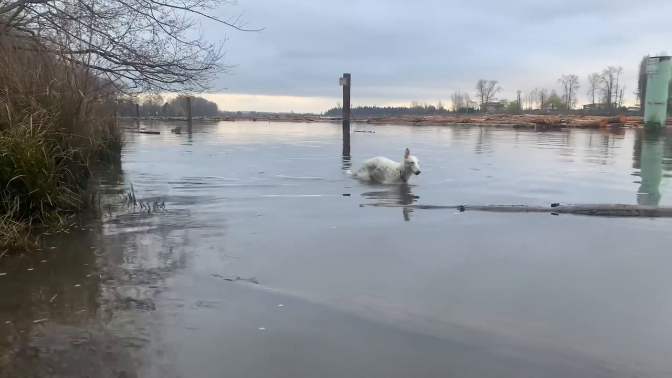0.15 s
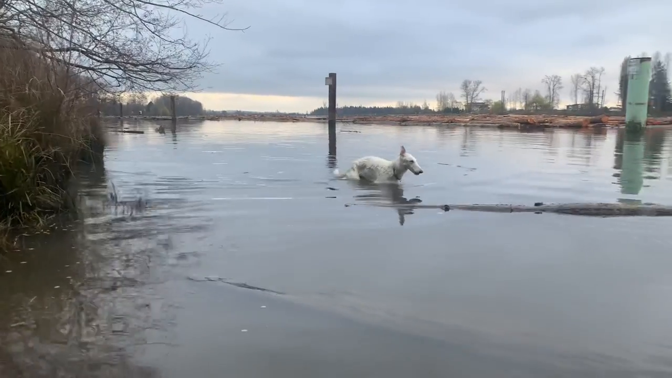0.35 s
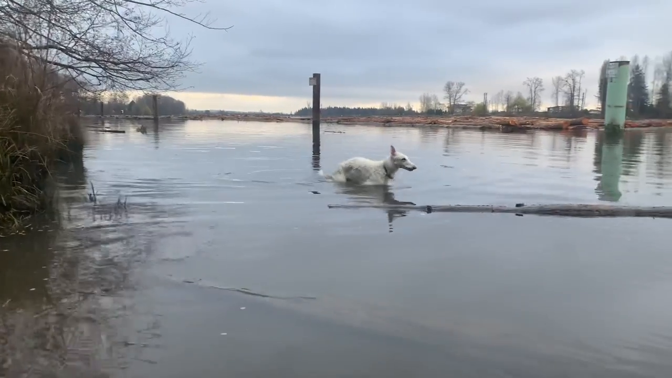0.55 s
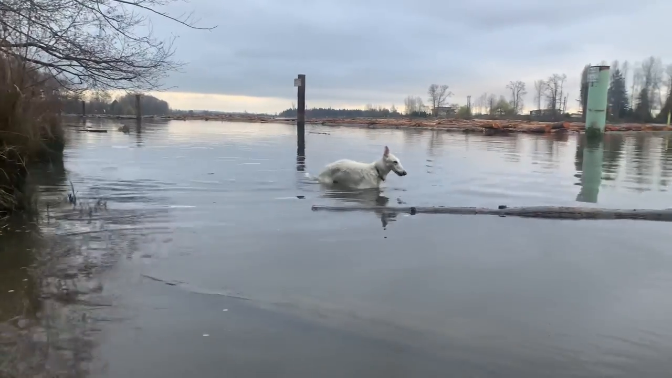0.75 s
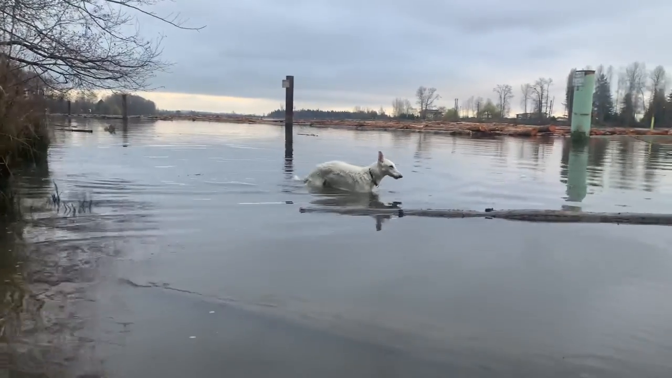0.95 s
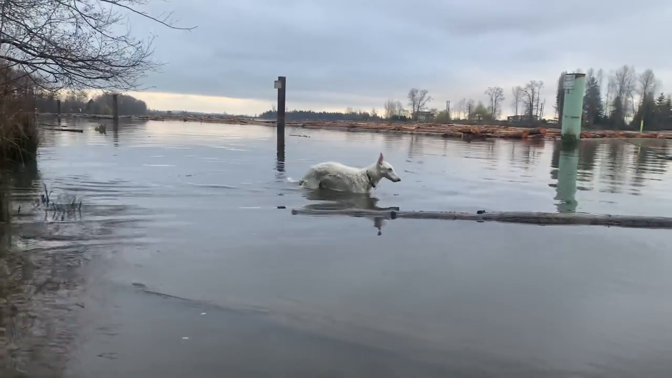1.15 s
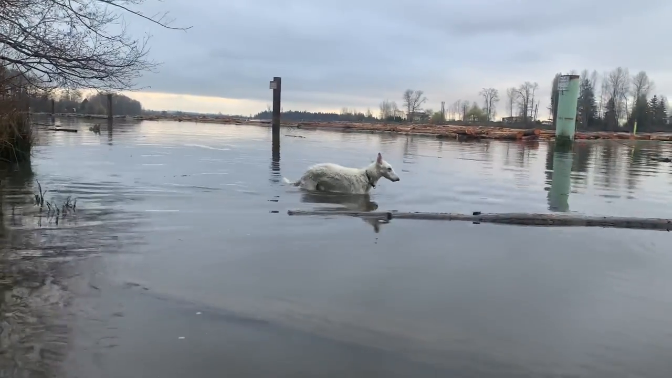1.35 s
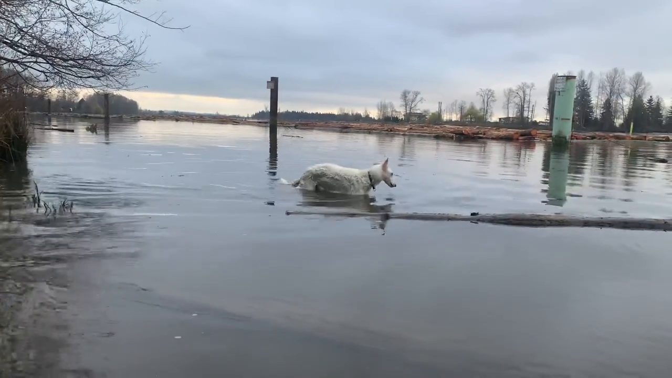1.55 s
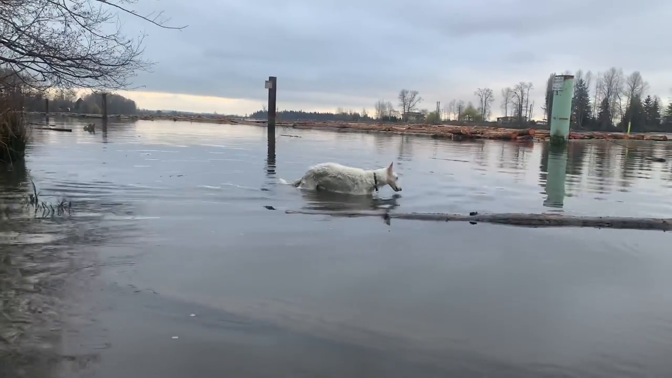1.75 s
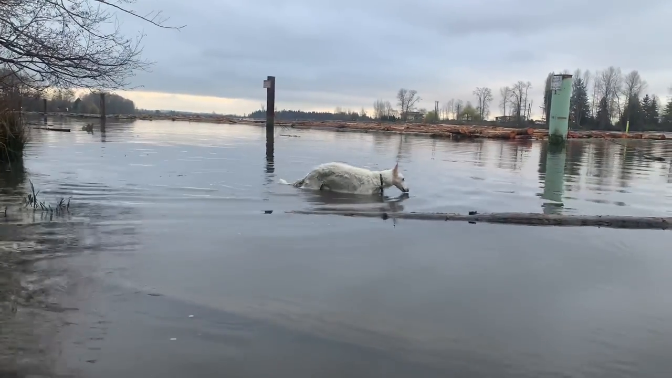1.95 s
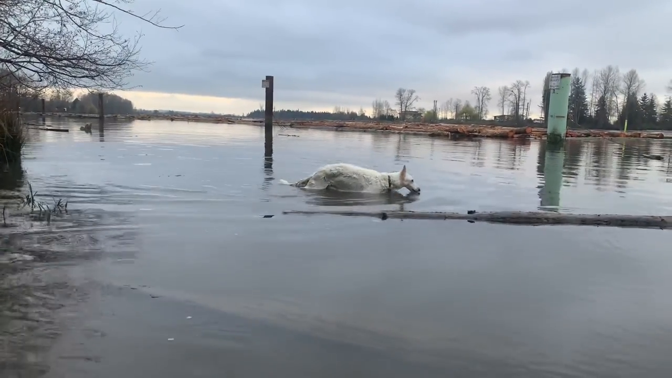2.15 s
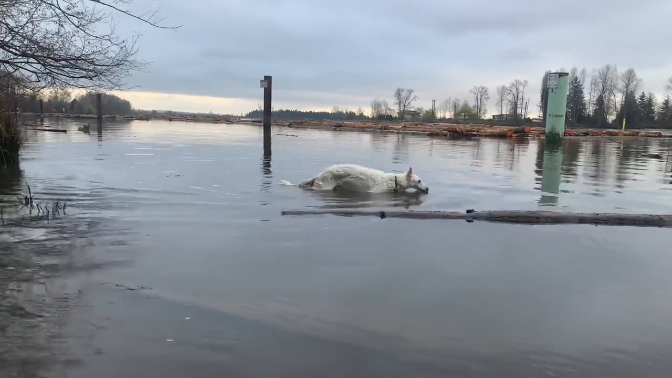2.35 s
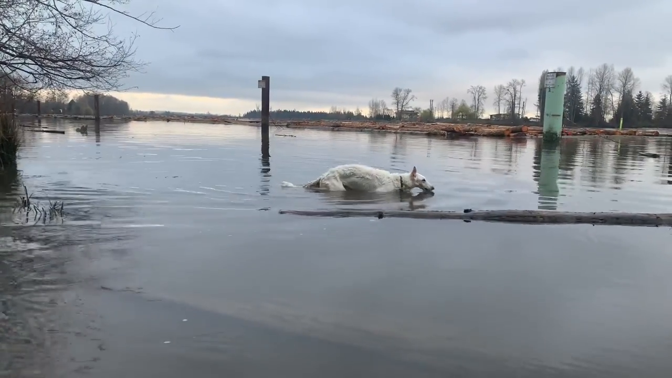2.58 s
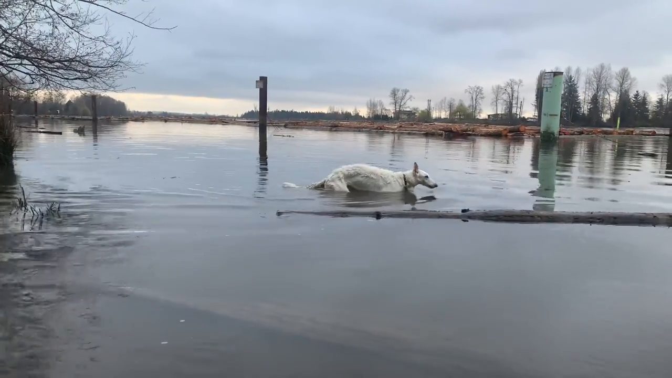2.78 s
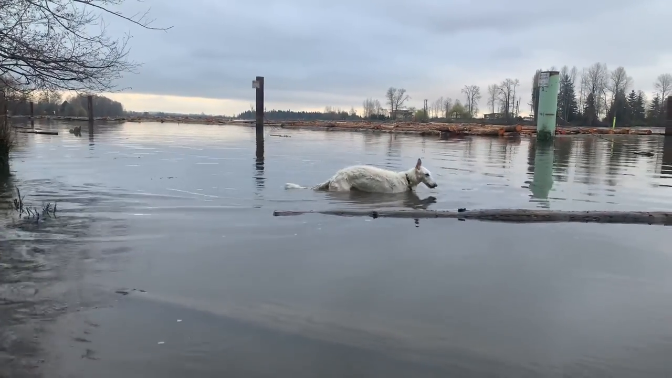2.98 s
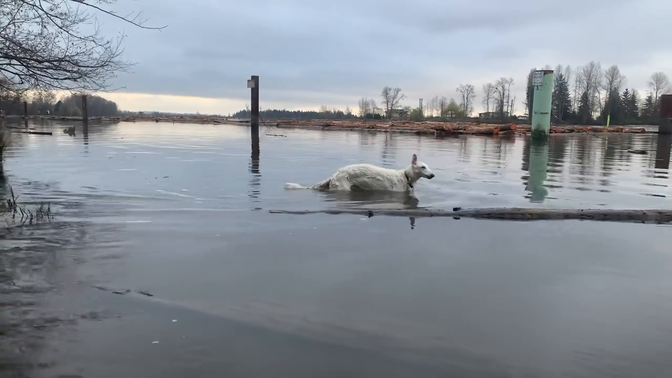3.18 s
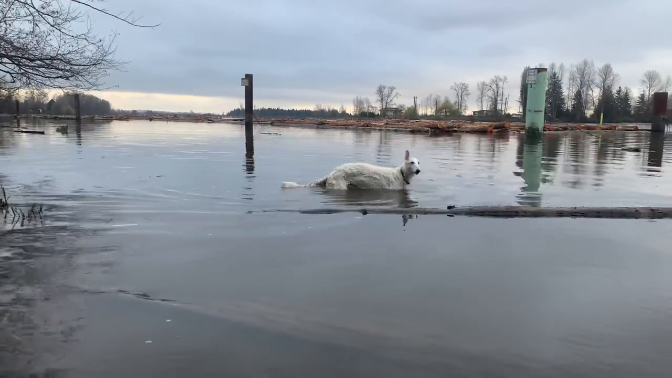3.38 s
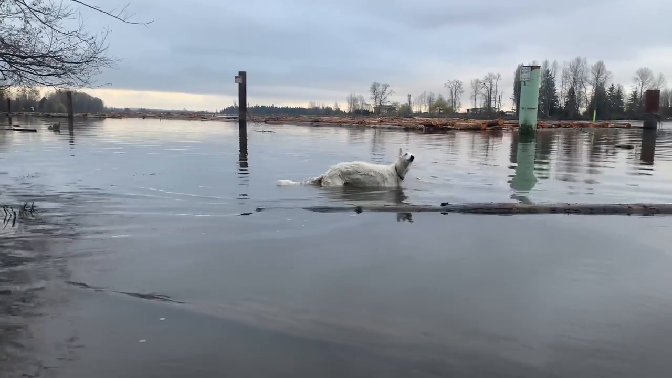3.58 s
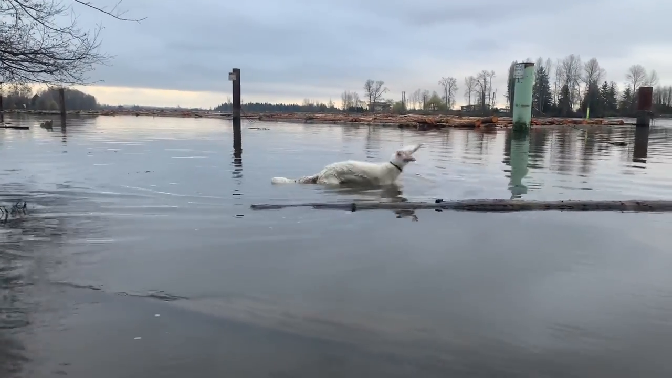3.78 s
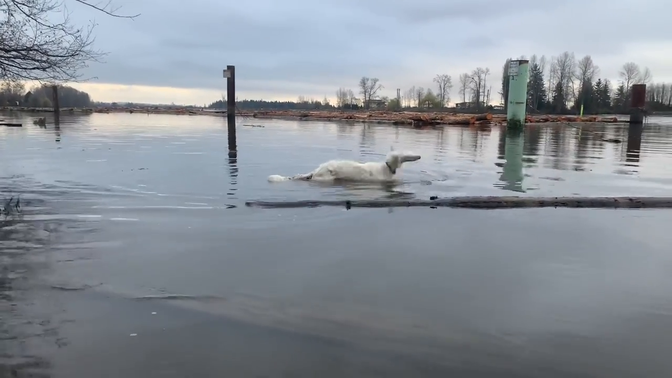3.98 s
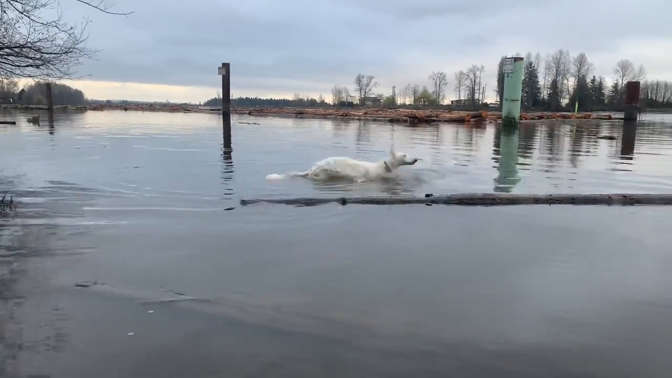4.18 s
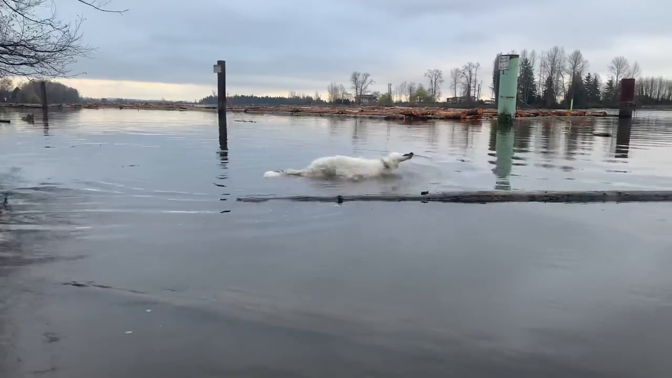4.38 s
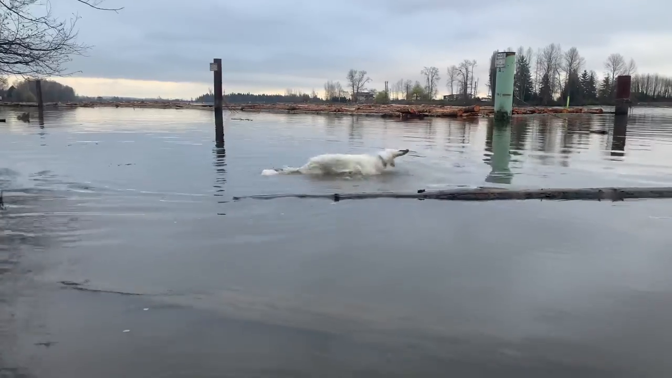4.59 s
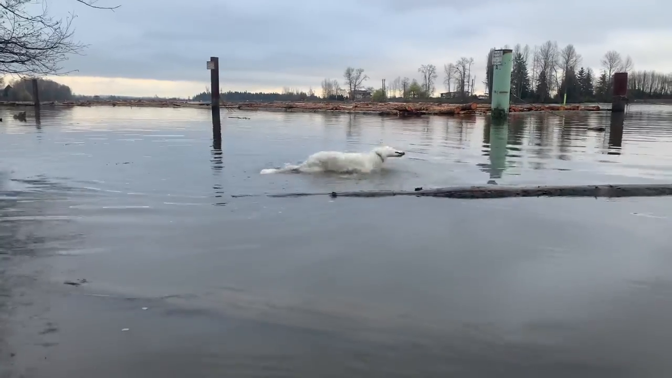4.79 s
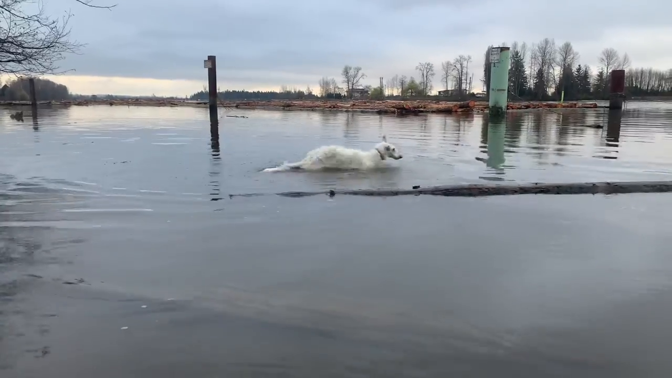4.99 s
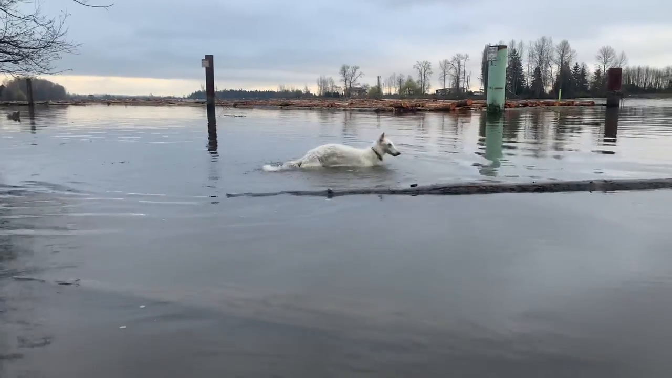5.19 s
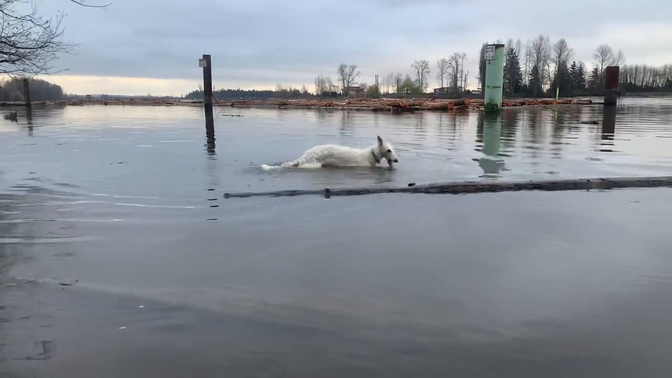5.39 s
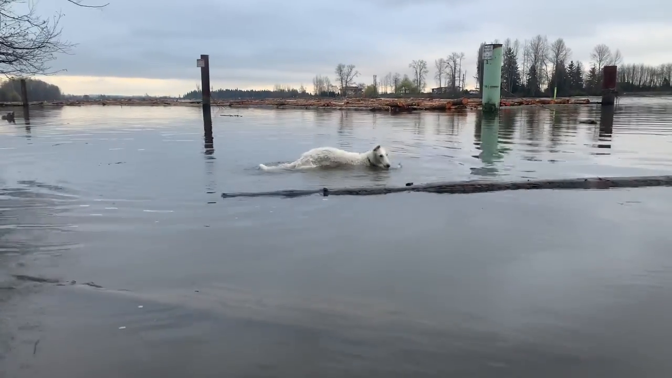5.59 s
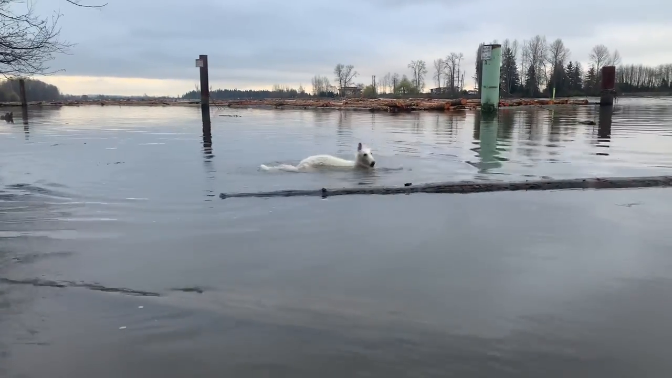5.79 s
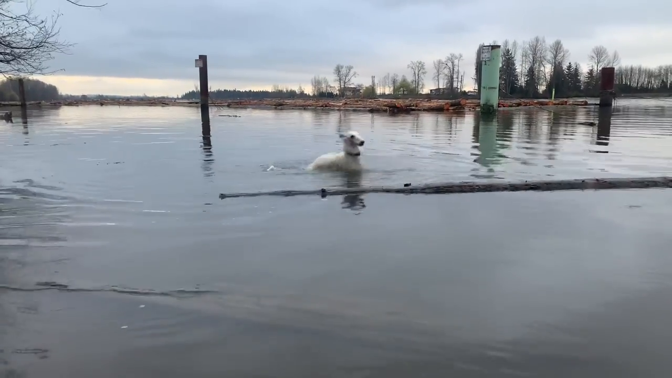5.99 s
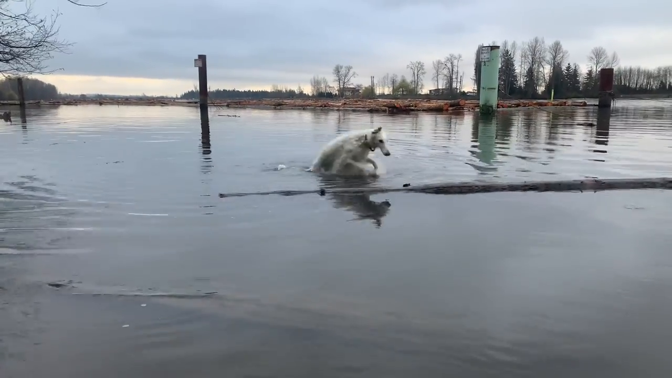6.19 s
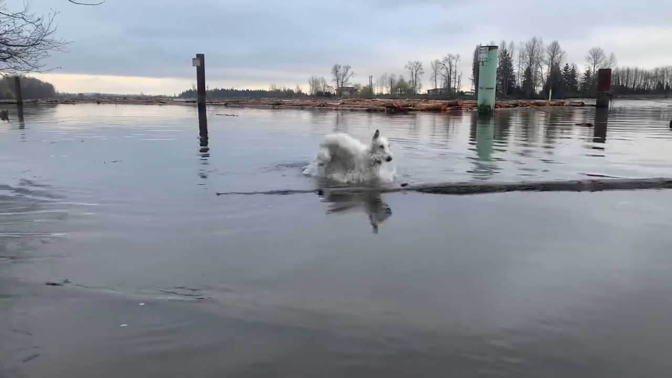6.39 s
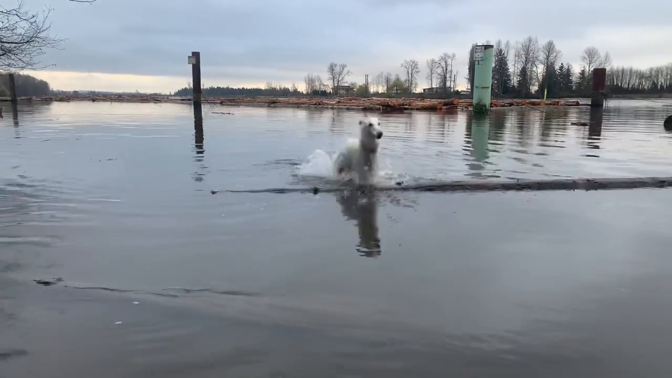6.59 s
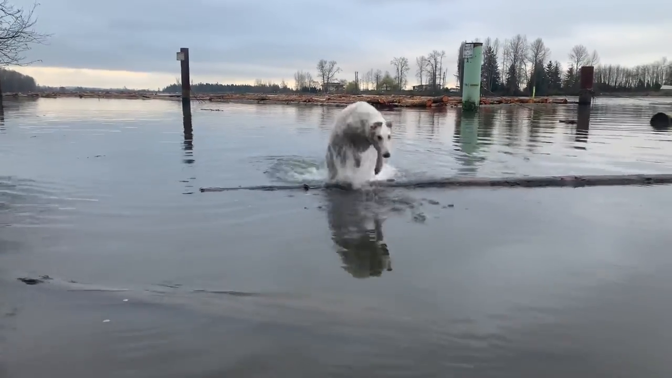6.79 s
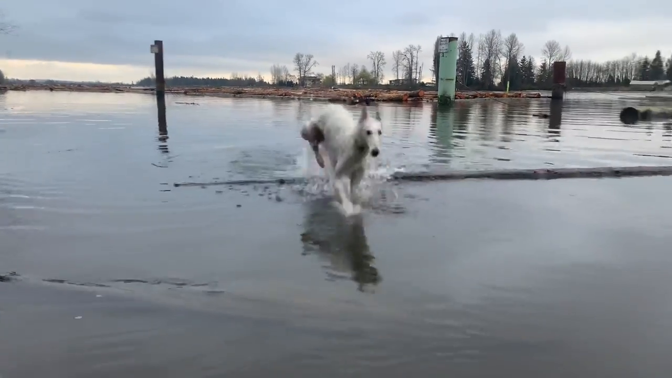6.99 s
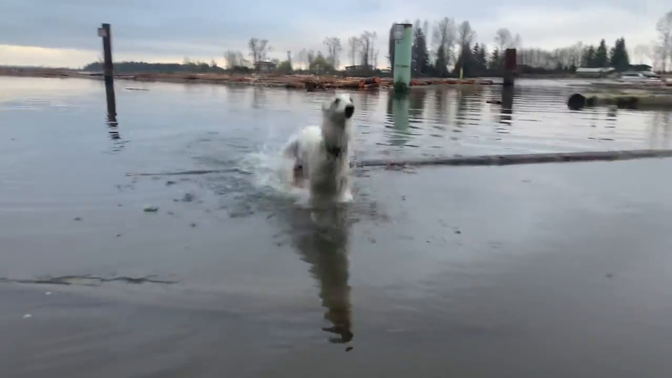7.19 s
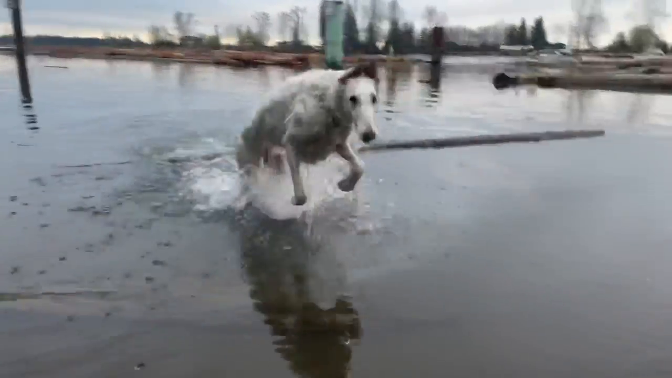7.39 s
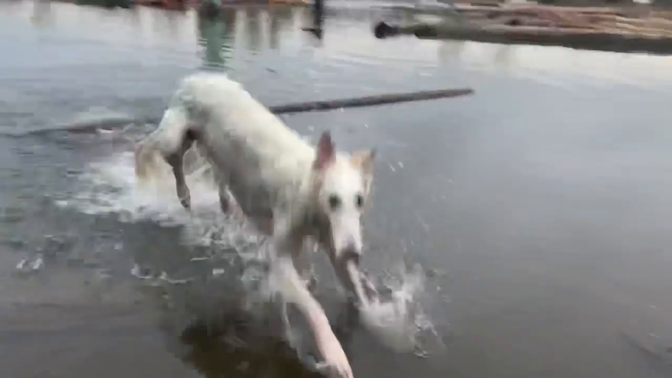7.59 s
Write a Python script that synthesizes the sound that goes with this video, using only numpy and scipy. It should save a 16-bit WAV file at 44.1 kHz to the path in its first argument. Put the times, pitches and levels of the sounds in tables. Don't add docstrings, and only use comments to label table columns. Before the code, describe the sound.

A phone on the riverbank picks up a soft bassy wash and constant far engine drone in open air. Tiny clear water drops tick irregularly from a dog standing in the shallows. Midway comes a burst of sloshing, gurgling and fizzing spray, which dies down to scattered drips. Then big plunging splashes with hollow glugs and muffled paw thuds rush nearer, ending on a sharp, very close splash.

```python
import sys
import numpy as np
from scipy import signal
from scipy.fft import rfft, irfft, next_fast_len
from scipy.io import wavfile
from scipy.ndimage import uniform_filter1d, map_coordinates

SR = 44100
rng = np.random.default_rng(int(sys.argv[2]) if len(sys.argv) > 2 else 0)


def generate_wav(sig):
    pcm = np.round(np.clip(np.atleast_2d(sig).T, -1, 1) * 32767).astype(np.int16)
    wavfile.write(sys.argv[1], SR, pcm)


def undo_db(level):
    steps = np.asarray(level, float) / 20
    return 10 ** steps


N = 337365


def unit(x):
    return x / np.sqrt(np.mean(x ** 2) + 1e-20)


def along(points, hz):
    f, v = np.transpose(points)
    return np.interp(np.log(hz + 1), np.log(f + 1), v)


def curves(rows):
    s, *cols = np.transpose(rows)
    return [np.interp(np.arange(N) / SR, s, c) for c in cols]


def wobble(rate):
    knots = rng.standard_normal(int(N * rate / SR) + 4)
    return map_coordinates(knots, [np.arange(N) * rate / SR])


def filtered(x, response):
    m = next_fast_len(N + 8192)
    return irfft(rfft(x, m) * response(np.fft.rfftfreq(m, 1 / SR)), m)[..., :N]


def patchy(patchy_db):
    z = signal.stft(rng.standard_normal(N), nperseg=512)[2]
    field = uniform_filter1d(rng.standard_normal(z.shape), size=3, axis=0)
    field = uniform_filter1d(field, size=6, axis=1)
    return signal.istft(z * undo_db(patchy_db * unit(field)), nperseg=512)[1][:N]


def peaked(rows, rise, fall):
    s, db = np.transpose(rows)[:2, :, None]
    lag = np.arange(0, N, 32) / SR - s
    return db + np.minimum(lag * rise, -lag * fall)


def joined(*levels_db):
    def full(p):
        return np.interp(np.arange(N), np.arange(p.shape[-1]) * N / p.shape[-1], p)
    return 10 * np.log10(sum(full(undo_db(2 * np.atleast_2d(db)).sum(0)) for db in levels_db))


def bubbles(s, gain, hz, t60, rise, size):
    t, gain, hz, t60, rise = map(np.float32, (np.arange(size) / SR, gain, hz, t60, rise))
    age = t / t60[:, None]
    turns = hz[:, None] * t * (1 + rise * np.minimum(age, 1))
    onset = 1 - np.exp(-hz[:, None] * t * 0.92)
    wave = gain[:, None] * np.sin(2 * np.pi * turns) * undo_db(-60 * age) * onset
    at = (s * SR).astype(int)[:, None] + np.arange(size)
    return np.bincount(at.ravel(), wave.ravel(), N + size)[:N]


def froth(spectrum, centre_hz, spread, cycles, scatter_db, share, patchy_db, count, size):
    def colour(f):
        return undo_db(along(spectrum, f))

    def grain_colour(f):
        away = np.log((f + 1) / centre_hz) / spread
        return colour(f) * np.exp(np.minimum(away ** 2 / 4, 1.5))

    sheets = []
    for _ in range(2):
        s = rng.random(count) * N / SR
        g, loud = rng.standard_normal((2, count))
        hz = np.clip(centre_hz * np.exp(spread * g), 100, 14000)
        grains = bubbles(s, undo_db(scatter_db * np.clip(loud, -3, 2)), hz, cycles / hz, 0.1, size)
        grains = unit(filtered(grains + np.roll(grains, N // 3), grain_colour))
        bed = unit(filtered(patchy(patchy_db), colour))
        sheets.append(np.sqrt(share) * grains + np.sqrt(1 - share) * bed)
    return np.array(sheets)


# (pitch [Hz], level [dB per Hz])
VALLEY_COLOUR = [(25, -22.5), (45, -0.5), (70, -0.5), (100, 2.5), (130, 3), (165, -4.5), (250, -14),
                 (500, -22), (1000, -26.5), (1300, -33.5), (1600, -39), (2500, -50.5), (3300, -67.5),
                 (5500, -64.5), (15000, -60)]


def valley():
    wash = unit(filtered(np.array([patchy(1.2), patchy(1.2)]), lambda f: undo_db(along(VALLEY_COLOUR, f))))
    level_db = -41 + 0.6 * wobble(3.3)
    return undo_db(level_db) * wash


# (pitch [Hz], rms level [dB])
DRONE_TONES = [
    (62.55, -35),
    (125.1, -48),
]
# (time [s], pitch [Hz], rms level [dB])
REVVING = [
    (3.6, 35.7, -68.5),
    (3.8, 39, -46),
    (4.1, 48.37, -44.5),
    (4.6, 46.63, -54),
    (5.5, 46.47, -59),
    (6.5, 49.5, -44.5),
    (7.65, 53.4, -55),
]


def engines():
    t = np.arange(N) / SR
    sway = 0.28 * wobble(1.2)
    drone = np.zeros(N)
    for k, (hz, db) in enumerate(DRONE_TONES, 1):
        drone += undo_db(db + 0.5 * k * wobble(2.2)) * np.sin(2 * np.pi * hz * t + k * sway)
    hz, db = curves(REVVING)
    running = t > REVVING[0][0]
    second = undo_db(db) * running * np.sin(2 * np.pi * np.cumsum(hz) / SR)
    return np.sqrt(2) * (drone + second)


# (time [s], peak level [dB], pitch [Hz], time to fall 60 dB [s])
PAW_THUDS = [
    (6.359, -30.5, 118.7, .15),
    (7.054, -20.5, 68.5, 0.067),
    (7.134, -25, 66.5, 0.17),
    (7.245, -21.5, 66.5, 0.12),
]


def thuds():
    t = np.arange(N) / SR
    out = np.zeros(N)
    for s, db, hz, t60 in PAW_THUDS:
        age = np.maximum(t - s, 0)
        swell = (1 - np.exp(-age / 0.013)) ** 2
        out += undo_db(db + 14.5 - 60 * age / t60) * swell * np.sin(2 * np.pi * hz * age)
    return out


DRIPS = [(.023, -63, 3280), (.93, -65, 4580), (.424, -47, 2120), (.425, -56, 7600), (.455, -60.5, 7300),
         (.474, -61, 2770), (.646, -60.5, 6000), (.697, -59, 2660), (.82, -63.5, 6610), (.837, -59.5, 3350),
         (.837, -58, 7050), (.902, -63, 6230), (1.324, -59.5, 2470), (1.478, -60.5, 8200),
         (2.055, -67, 3330), (2.258, -62.5, 3980), (2.297, -54, 3450), (2.41, -57.5, 3540),
         (2.492, -58.5, 2640), (2.582, -54.5, 3100), (2.599, -51.5, 2580), (2.607, -49.5, 2180),
         (2.632, -57.5, 3870), (3.852, -62.5, 2880), (3.027, -64, 6010), (3.115, -58, 1560),
         (3.134, -64, 3580), (3.711, -57.5, 2110), (3.768, -61, 3160), (3.814, -64, 3270)]
SPATTER = [(.115, -40.5, 1180), (.635, -47.5, 1065), (1.939, -42.5, 1650), (1.939, -42, 2220),
           (2.635, -48, 2470), (3.109, -53.5, 2510), (3.17, -44.5, 1496), (4.054, -37, 3460),
           (4.163, -38.5, 1950), (4.236, -28, 2080), (4.263, -33, 1110), (4.278, -27.5, 2230),
           (4.288, -32, 1080), (4.509, -28.5, 5940), (4.617, -27, 1930), (4.837, -35, 1540),
           (4.872, -31, 2300), (5.246, -40, 1070), (5.297, -44, 2740), (5.468, -39.5, 2840),
           (5.513, -50, 3410), (5.674, -44, 2060), (5.71, -50, 1920), (5.803, -44, 1770),
           (5.885, -43.5, 3520), (6.021, -38.5, 2166), (6.14, -25.5, 1110), (6.208, -25, 2620),
           (7.132, -21.5, 1800), (7.546, -14.5, 2960)]
BLOOPS = [(.424, -45.5, 1690), (3.988, -49, 1860), (4.051, -37.5, 1440), (4.071, -44, 3230),
          (4.299, -37, 2410), (4.388, -48, 1600), (4.465, -39, 727), (4.506, -37, 2410), (4.589, -37, 997),
          (4.735, -36.5, 1510), (4.94, -33, 755), (5.017, -35.5, 2770), (5.059, -37.5, 440),
          (5.09, -37.5, 640), (5.179, -34, 975), (5.455, -48, 2450), (5.469, -44.5, 8600),
          (5.512, -51.5, 5800), (5.724, -55, 3630), (5.811, -47, 2400), (5.814, -52, 5730),
          (5.993, -44.5, 1390), (5.962, -47, 1320), (5.999, -46.5, 3060), (6.049, -41, 1310),
          (6.284, -29, 2400), (6.365, -25.5, 1160), (6.385, -31, 1130), (6.916, -36, 1030),
          (7.543, -26.5, 1065)]
GULPS = [(4.165, -36, 610), (5.12, -46.5, 625), (5.522, -38.5, 449), (6.116, -39, 454.5), (6.158, -24, 409),
         (6.234, -26, 381), (6.264, -30, 460), (6.289, -27, 482), (6.365, -22.5, 516), (6.371, -10, 458),
         (6.386, -23, 480), (6.419, -23, 600), (6.432, -28, 420), (6.141, -30.5, 520), (6.409, -18, 663),
         (6.519, -33, 687), (6.549, -22.5, 342), (6.579, -24, 626), (6.594, -36, 478), (6.699, -40.5, 375),
         (7.012, -26, 449), (7.043, -24, 677), (7.124, -25.5, 507), (7.132, -21, 402), (7.159, -25.5, 485),
         (7.187, -21, 545), (7.224, -23, 341), (7.285, -26, 392), (7.321, -23, 338), (7.356, -26.5, 437),
         (7.419, -40.5, 523), (7.459, -26, 431), (7.546, -22, 613)]
TRICKLES = [(0.044, -74.5, 2490), (.82, -71, 2340), (.145, -74, 1950), (2.68, -82.5, 3470),
            (2.715, -79, 3490), (2.77, -80, 3420), (2.81, -84, 3400), (2.975, -80, 2600), (3.0, -78, 3750),
            (3.04, -81, 2500), (3.2, -80.5, 2500), (2.31, -82, 3300)]
TICKS = [(.022, -54, 2300), (.631, -59, 1035), (1.539, -61, 1900), (2.557, -59.5, 1010), (2.699, -59, 950),
         (3.005, -63.5, 8200), (3.972, -56.5, 2020), (4.02, -56, 2450), (4.139, -53, 1910),
         (4.222, -43, 1180), (4.707, -39, 2390), (4.999, -38, 3000), (5.127, -44, 2060), (5.194, -48, 1020),
         (5.9, -58, 5600), (5.835, -53, 2600), (6.087, -38, 2500), (6.25, -36, 2100), (6.589, -33, 2300),
         (6.949, -34, 2470), (6.992, -29, 2860), (7.078, -30, 2400), (7.341, -33.5, 1830),
         (7.429, -32, 2320)]


def drops():
    drip_cycles, trickle_cycles = 57, 850
    kinds = [(DRIPS, drip_cycles), (SPATTER, 18.5), (BLOOPS, 34), (GULPS, 14.4),
             (TRICKLES, trickle_cycles), (TICKS, 30.3)]
    events = [[*row, cycles] for rows, cycles in kinds for row in rows]
    s, db, hz, cycles = np.transpose(events)
    t60 = cycles / hz
    rise = np.where(hz < 800, 0.4, 0.08)
    rise = (rise * np.minimum(drip_cycles / cycles, 1))[:, None]

    def ring(k):
        return bubbles(s[k], undo_db(db[k] + 4), hz[k], np.clip(t60[k], 0.004, 0.4), rise[k], size=6000)

    is_drop = cycles < trickle_cycles
    threads = ring(~is_drop) * wobble(120)
    direct = ring(is_drop) + threads
    late, pitch = rng.random((len(s), 2)).T
    satellite_hz = hz * (0.75 + 0.7 * pitch)
    direct = direct + bubbles(s + 0.02 * late, undo_db(db - 2) * is_drop, satellite_hz, t60 / 2, rise, size=2000)
    tails = rng.standard_normal((2, 4000)) * undo_db(-60 * np.arange(4000) / SR / 0.068)
    smear = signal.fftconvolve(direct[None], tails / np.linalg.norm(tails[0]), axes=1)[:, :N]
    smear = filtered(smear, lambda f: 0.44 + 0.55 / (1 + (1000 / (f + 1)) ** 2))
    return np.array([direct + undo_db(-1.5) * smear[0], smear[1]])


# (time [s], peak level [dB], centre pitch [Hz], time to fall 60 dB [s])
SLAPS = [(.114, -52, 2220, 0.073), (0.276, -52, 1490, .03), (.424, -54.5, 2600, 0.068),
         (0.541, -58.5, 2500, 0.049), (.819, -61, 4500, 0.083), (1.539, -61, 2000, 0.032),
         (1.801, -55, 2290, 0.085), (1.896, -61.5, 1990, .015), (2.194, -50, 1500, 0.024),
         (2.257, -59.5, 4200, 0.11), (2.403, -55.5, 3500, 0.044), (2.491, -59, 2490, 0.036),
         (2.595, -55, 3760, .1), (3.697, -56, 2780, .04), (4.051, -39, 4900, 0.1),
         (4.165, -38, 3520, 0.045), (4.285, -39, 5500, 0.044), (5.279, -50, 7000, .04),
         (5.455, -46, 4000, 0.029), (5.509, -42.5, 5100, 0.06), (5.804, -50, 3500, .06),
         (6.096, -36, 2500, .04), (6.409, -23, 1500, 0.08), (.022, -58, 2600, .04),
         (.145, -61.5, 2000, .06), (2.806, -63, 3400, .05), (3.178, -57.5, 2200, 0.033),
         (4.379, -39, 3200, 0.022), (4.448, -39.5, 3300, .04), (4.679, -40, 2500, .02),
         (5.245, -42, 3000, 0.025), (5.962, -50, 1500, .03), (5.58, -57, 6500, .04), (5.72, -54, 7000, .02),
         (5.992, -57, 5500, .03), (6.055, -56, 7500, .02), (6.293, -36, 8000, .02),
         (6.905, -27, 3000, 0.054), (7.177, -23, 3000, 0.022), (7.213, -21, 3000, .02),
         (7.497, -24.5, 1700, .02), (7.555, -24.5, 3300, .04), (7.641, -20, 1500, .02),
         (7.543, -9.5, 3850, .02), (7.63, -15.5, 4600, 0.04)]
# (time [s], peak level [dB], centre pitch [Hz])
PINS = [(3.986, -56, 9000), (4.213, -50, 11000), (4.594, -50, 9000), (4.871, -46.5, 9000),
        (4.965, -50, 13000), (5.287, -52, 3500), (5.437, -57, 9500), (5.448, -54, 2600), (5.707, -54, 2520),
        (5.749, -57, 4500), (6.115, -40.5, 12000), (6.141, -32, 2500), (6.174, -40, 8000),
        (6.365, -26, 900), (.277, -58.5, 1500), (1.939, -50, 2000)]


def slaps():
    pin_t60_s, rise_s, size = 0.012, 0.001, 4096
    events = SLAPS + [(*row, pin_t60_s) for row in PINS]
    s, db, hz, t60 = np.transpose(events)[:, :, None]
    t, f = np.arange(size) / SR, np.fft.rfftfreq(size, 1 / SR)
    width = np.where(f > hz, 0.36, 0.51)
    bell = np.exp(-(np.log((f + 1) / hz) / width) ** 2 / 2)
    noise = irfft(rfft(rng.standard_normal((2, len(s), size))) * bell)
    noise = noise * undo_db(1.8 * rng.standard_normal((len(s), 64)).repeat(64, 1))
    envelope = undo_db(db - 6.0 - 60 * t / t60) * (1 - np.exp(-t / rise_s))
    burst = noise / noise.std(2, keepdims=True) * envelope
    at = ((s * SR).astype(int) + np.arange(size)).ravel()
    return np.array([np.bincount(at, b.ravel(), N + size)[:N] for b in burst])


# (pitch [Hz], level [dB per Hz])
GURGLE_COLOUR = [(110, -30.5), (180, -11), (296, -5.5), (383, -1), (508, -1), (581, -3.5), (858, -4.5),
                 (1500, -12), (1950, -47), (3300, -120)]
# (pitch [Hz], level [dB per Hz])
SPLASH_COLOUR = [(410, -35), (700, -6.5), (845, -16), (1080, -5), (1300, -7), (1480, -3), (2920, -3),
                 (5010, -22.5), (6000, -11.5), (7800, -38.5), (13200, -120)]
# (pitch [Hz], level [dB per Hz])
SPRAY_COLOUR = [(2060, -22.5), (3500, -4.5), (4990, -12), (6010, -13), (8740, -12), (11000, -20.5),
                (13600, -22), (14300, -25.5), (15600, -34.5), (16000, -80)]
# (time [s], effort [dB], depth [dB])
STIRRING = [(0, -84, 17), (3.93, -91, 25), (4.03, -64, 4.5), (4.12, -64, 4), (4.26, -55, -5),
            (5.21, -54, -10.5), (5.31, -88, 19), (5.48, -82, -2), (5.63, -92, 17), (5.86, -70, 13),
            (6.045, -66.5, 0), (6.095, -47, 8.5), (6.3, -41.5, 4.5), (6.86, -43, 6), (6.98, -39.5, -1),
            (7.39, -43, 10), (7.59, -39.5, -0.5), (7.65, -32, 4)]
# (time [s], peak level [dB], fineness [dB])
FLINGS = [(0.03, -73, -10), (0.43, -74, 1.5), (1.94, -83, -4), (2.27, -72.5, 2.5), (2.6, -69, -6),
          (3.08, -71, -11.5), (4.051, -54.5, 1.5), (4.17, -61, 7), (4.24, -52, 2), (4.29, -53, 12),
          (4.5, -44.5, 7), (4.62, -60, 7.5), (4.73, -46, 5.5), (4.88, -53, 6.5), (5.0, -46, 5),
          (5.28, -62, 5), (5.51, -61.5, -14), (5.59, -66, -3), (5.71, -66, -4), (5.82, -62, -8),
          (5.99, -61, -19), (4.39, -55, -2), (4.84, -55, -3), (5.1, -51, -4), (5.19, -57, -2),
          (7.0, -42.5, -0.5), (7.1, -42, 0), (6.158, -40.5, -14), (6.3, -44.5, 2), (6.45, -42.5, 1.5),
          (6.57, -40.5, -7), (6.641, -44, -8), (6.921, -44.5, 2.5), (7.22, -34.5, -4.5), (7.565, -40.5, 5)]
# (time [s], peak level [dB])
PLUNGES = [(2.54, -57.5), (2.96, -55.5), (4.29, -50.5), (4.56, -46.5), (4.66, -55.5), (4.95, -52.5),
           (5.07, -44.5), (5.13, -46.5), (5.51, -64), (5.59, -59), (5.71, -53.5), (6.16, -36), (6.38, -27),
           (6.45, -37.5), (6.57, -28), (7.16, -32.5), (7.22, -28.5), (7.39, -39)]


def churn():
    t = np.arange(N) / SR
    effort_db, depth_db = curves(STIRRING)
    flung_db = peaked(FLINGS, rise=208, fall=192)
    plunge_db = peaked(PLUNGES, rise=172, fall=132)

    def fine(db):
        return -53.5 + 1.07 * (db + 40.5)

    fineness_db = np.array(FLINGS)[:, 2:]
    mist_db = -93
    gurgle_db = joined(effort_db + depth_db, plunge_db)
    splash_db = joined(effort_db, flung_db)
    spray_db = joined(fine(effort_db), fine(flung_db) + fineness_db, mist_db)
    charge_s, nearing_db_per_s = 6.25, 6
    spray_db = spray_db + nearing_db_per_s * np.maximum(t - charge_s, 0)

    lumps, crackle = wobble(22), wobble(110)
    gurgle = froth(GURGLE_COLOUR, 457.8, 0.469, cycles=22, scatter_db=3, share=0.53, patchy_db=3,
                   count=3600, size=900)
    splash = froth(SPLASH_COLOUR, 2193, 0.532, cycles=24, scatter_db=5.0, share=0.63, patchy_db=3.5,
                   count=8000, size=400)
    spray = froth(SPRAY_COLOUR, 7500, 0.42, cycles=54, scatter_db=8.0, share=0.37, patchy_db=3,
                  count=9000, size=260)
    finest = filtered(spray, lambda f: 1 / (1 + (10000 / (f + 1)) ** 8))
    finest_db = np.clip(100 * (t - 6.17), -6.5, 0)
    spray = spray - finest * (1 - undo_db(finest_db))

    out = undo_db(gurgle_db - 2.0 + 2.0 * wobble(25)) * gurgle
    out = out + undo_db(splash_db + 2.0 + 0.32 * lumps + 1.3 * crackle) * splash
    return out + undo_db(spray_db + 6.0 + 0.54 * lumps + 1.3 * crackle) * spray


# (delay [s], level [dB])
ECHOES = [
    (.00193, -20.5),
    (.0029, -26.5),
]


def mirrored(x):
    return filtered(x, lambda f: 1 + sum(undo_db(db) * np.exp(-2j * np.pi * f * s) for s, db in ECHOES))


# (pitch [Hz], lead [rad])
PORT_LEAD = [(60, 0.43), (130, 0.47), (300, .05), (600, -0.69), (800, -1.06), (1000, -1.28), (1300, 1.5),
             (1600, 1.86), (2500, -0.78), (3000, -0.44), (6500, -0.14)]
# (pitch [Hz], left minus right [dB])
PORT_TILT = [(63, 1.3), (110, -1), (300, 0.5), (520, -4.5), (800, -1.4), (1150, 3.5), (2000, -0.8),
             (6000, -1.3), (10000, -2.5)]


def ports(pair, alike):
    def response(f):
        lead = along(PORT_LEAD, f) + 2 * np.pi * np.maximum(f - 7200, 0) / 3020
        tilt = along(PORT_TILT, f) * np.log(10) / 40
        ear = np.exp([tilt - 0.5j * lead, -tilt + 0.5j * lead])
        turn = np.arccos(np.clip(along(alike, f), 0, 1)) / 2
        return ear * np.array([[np.cos(turn)] * 2, [np.sin(turn), -np.sin(turn)]])
    return filtered(pair[:, None], response).sum(0)


# (pitch [Hz], likeness [0 to 1])
NEAR_ALIKE = [(200, 0.98), (600, 0.93), (1000, .8), (1400, 0.71), (2500, 0.6), (5000, 0.04), (8500, 0.64)]
# (pitch [Hz], likeness [0 to 1])
FAR_ALIKE = [(60, 0.92), (200, 0.98), (450, 0.61), (600, 0.84), (800, 0.33), (1200, 0.15), (5000, 0.22),
             (8500, 0.39)]


def scene():
    far = valley()
    far[0] += engines() + thuds()
    fade = np.minimum(np.arange(N) / SR / 0.006, 1)
    far = far * np.sin(fade * np.pi / 2) ** 2
    water = mirrored(drops() + slaps() + churn())
    return ports(far, FAR_ALIKE) + ports(water, NEAR_ALIKE)


def roll_off(x):
    return signal.sosfilt(signal.butter(12, 15160, fs=SR, output="sos"), x)


def record(dry):
    sum_and_difference = np.array([dry[0] + dry[1], dry[0] - dry[1]]) / 2
    hz, _, z = signal.stft(sum_and_difference, SR, nperseg=1024)
    power = uniform_filter1d(uniform_filter1d(abs(z) ** 2, size=9, axis=1), size=3, axis=2)
    margin_db = along([(4000, 30), (5000, 9), (9500, 9.1), (9800, 0.59)], hz)
    strong = undo_db(2 * margin_db)[:, None] * power >= power[::-1]
    brief = (hz[:, None] < 14000) | (power > 1.6 * uniform_filter1d(power, size=41, axis=2))
    mid, side = signal.istft(z * strong * brief, SR, nperseg=1024)[1][:, :N]
    mix = np.array([mid + side, mid - side])
    return roll_off(mix)


dry = scene()
out = record(dry)
generate_wav(out)
```